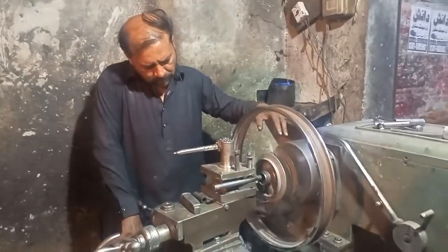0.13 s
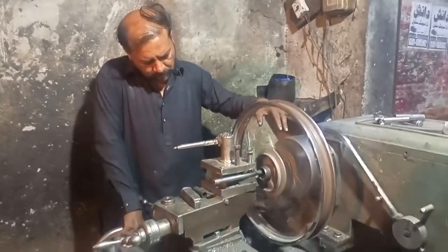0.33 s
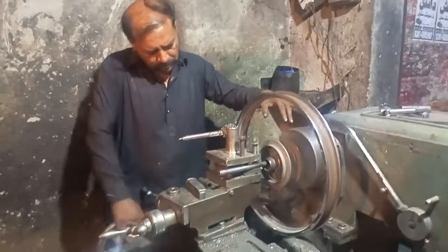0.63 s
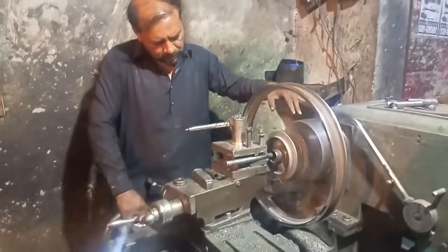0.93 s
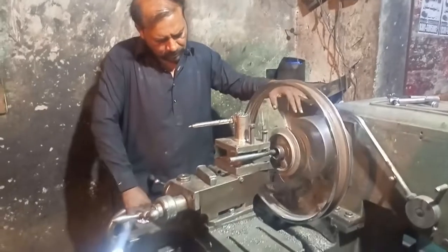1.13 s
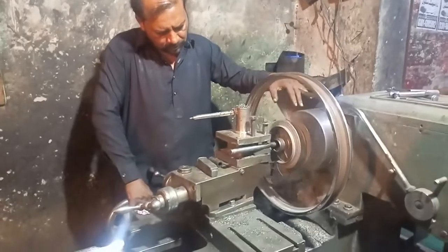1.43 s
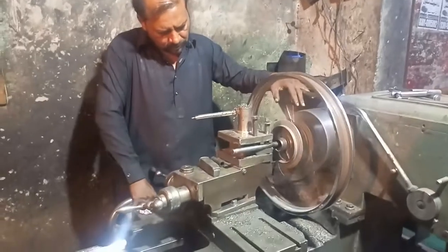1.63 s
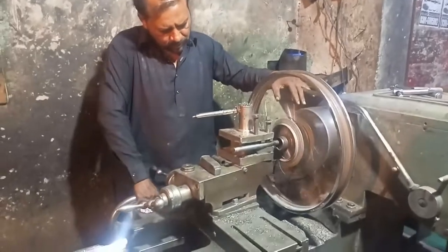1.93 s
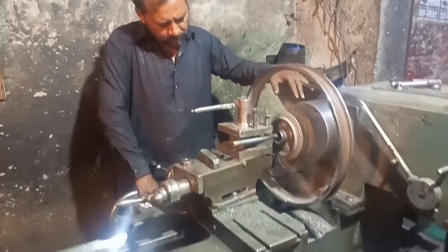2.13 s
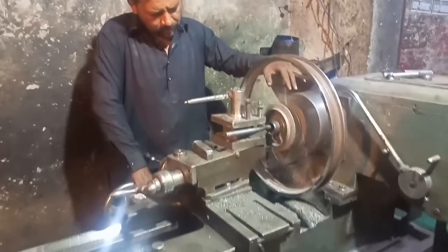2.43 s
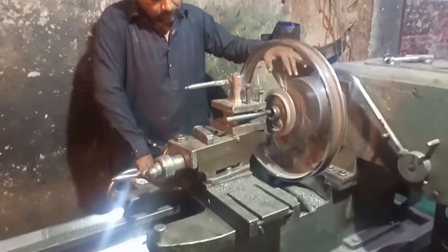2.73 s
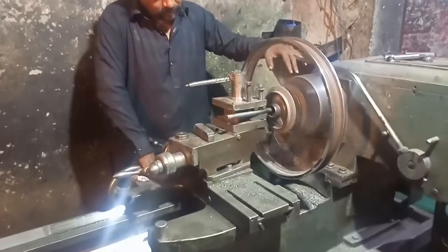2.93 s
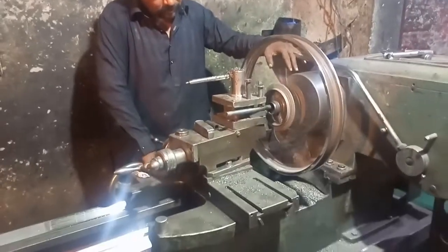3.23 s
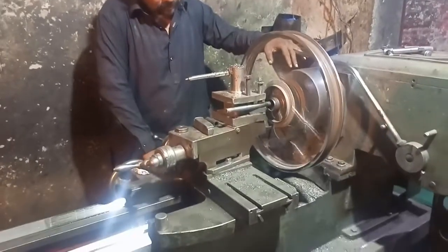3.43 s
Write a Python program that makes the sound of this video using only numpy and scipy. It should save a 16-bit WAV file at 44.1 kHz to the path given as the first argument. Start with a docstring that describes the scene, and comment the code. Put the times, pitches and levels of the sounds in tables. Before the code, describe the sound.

Metal scraping on a lathe: a thin whine near 2 kHz and soft gear hiss idle over a low, patchy workshop murmur with faint hum. At about 0.3 s the tool bites abruptly, with a dense bright rasp heaviest until 1.1 s, a chatter band climbing near 1 s. A thinner scrape follows, with uneven beating squeals and ringing flares, until 3.3 s, when it quickly dies back to idle.

```python
"""Metal lathe in a workshop

A lathe idles with a thin whine in front of one microphone; a tool bites into the turning wheel hub for three seconds.
The workshop lies beneath as a patchy murmur of shaped noise with brief soft tones; a low hum is two sines
of fixed pitch whose levels waver slightly. The idle is gear hiss and a band of noise; the scrape is friction
noise lifted at the hub's resonances, with a squeal that beats against a neighbouring mode,
a climbing chatter band and single modes that flare and fade.
"""
import sys
import numpy as np
from scipy import signal
from scipy.fft import rfft, irfft, next_fast_len
from scipy.io import wavfile
from scipy.ndimage import uniform_filter1d, map_coordinates

SR = 44100
rng = np.random.default_rng(int(sys.argv[2]) if len(sys.argv) > 2 else 0)


def file_out(sig):
    """Save sig as 16-bit WAV at sys.argv[1]."""
    # one column per channel
    cols = np.atleast_2d(sig).T
    # limit, then scale
    lim = np.clip(cols, -1, 1)
    pcm = np.round(lim * 32767).astype(np.int16)
    wavfile.write(sys.argv[1], SR, pcm)


N = 158760  # samples, 3.6 s


def amp(db):
    """Turn dB into gain."""
    return 10 ** (np.asarray(db) / 20)


def unit(x):
    """Scale to rms 1."""
    return x / np.sqrt(np.mean(x ** 2) + 1e-20)


def curves(rows):
    """Draw each column after the time as a line with one value per sample."""
    s, *cols = np.transpose(rows)
    return [np.interp(np.arange(N) / SR, s, c) for c in cols]


def wobble(rate):
    """Draw a smooth random curve with rate knots a second."""
    coarse = np.arange(0, N + 32, 32)
    knots = rng.standard_normal(int(N * rate / SR) + 4)
    return np.interp(np.arange(N), coarse, map_coordinates(knots, [coarse * rate / SR]))


def filtered(x, response):
    """Multiply the spectrum of x by a response of frequency."""
    m = next_fast_len(N + 8192)  # zero padding keeps the end from wrapping onto the start
    return irfft(rfft(x, m) * response(np.fft.rfftfreq(m, 1 / SR)), m)[..., :N]


def narrow_noise(turn, width_hz):
    """Noise around a moving centre: two random curves on a cosine and a sine of the phase turn."""
    return wobble(width_hz) * np.cos(turn) + wobble(width_hz) * np.sin(turn)


def patch_field(shape, high, long):
    """Random field of rms 1 over frequency and time, smoothed over high bins and long frames."""
    field = uniform_filter1d(rng.standard_normal(shape), size=high, axis=0)
    return unit(uniform_filter1d(field, size=long, axis=1))


# Narrow modes of the hub, levels relative to each other: (f/Hz, level/dB)
HUB_MODES = [(1787, -52.5), (1825, -62), (1873, -57), (1916, -51), (2035, -59.5), (2277, -73), (2713, -75),
             (2853, -77), (2961, -79), (3257, -71.5), (3418, -82), (4296, -69.5), (4463, -75.5),
             (4743, -68.5), (4791, -71), (4845, -73.5), (5023, -68), (5652, -84), (5868, -71),
             (6045, -67.5), (6191, -61.5), (6261, -70.5), (6535, -65), (6632, -60.5), (8150, -81),
             (8818, -60.5), (8931, -63), (9405, -67), (10820, -89)]
MODE_WIDTH_HZ, MODE_WANDER_HZ = 28, 22
MODE_FLICKER_DB, FLICKER_RATE = 3.6, 10  # the rate is in knots a second


def rush(spectrum, patchy_db, modes_db=None, bands_db=0):
    """Coloured noise of rms 1 with patches of random gain, lifted at the hub's wandering modes if asked."""
    z = signal.stft(rng.standard_normal(N), nperseg=1024)[2]
    gain_db = patchy_db * patch_field(z.shape, high=3, long=8)
    gain_db = gain_db + bands_db * patch_field(z.shape, high=8, long=18)
    patchy = signal.istft(z * amp(gain_db), nperseg=1024)[1][:N]
    f, level = np.transpose(spectrum)
    # straight lines over log frequency
    out = filtered(patchy, lambda hz: amp(np.interp(np.log(hz + 1), np.log(f + 1), level)))
    if modes_db is None:
        return unit(out)
    modes = [m for m in HUB_MODES if f[1] <= m[0] <= f[-2]]
    for hz, db in modes:
        turn = 2 * np.pi * np.cumsum(hz + MODE_WANDER_HZ * wobble(4)) / SR
        line = narrow_noise(turn, MODE_WIDTH_HZ) * np.sqrt(MODE_WIDTH_HZ / SR)
        over_db = level.max() + modes_db + db - max(m[1] for m in modes)
        out = out + amp(over_db + MODE_FLICKER_DB * wobble(FLICKER_RATE)) * line
    return unit(out)


def swells(rows, stretch, rough, spread_hz, skirt_hz):
    """Tones that rise and fade smoothly, unsteady in pitch, each blurred by narrow noise around it."""
    out, t = np.zeros(N), np.arange(N) / SR
    drift = spread_hz * wobble(30)
    skirt = rough * (wobble(skirt_hz) + 1j * wobble(skirt_hz))
    for s, length, hz, db in rows:
        at = np.arange(max(0, int((s - 2 * length) * SR)), min(N, int((s + 2 * length) * SR)))
        draw = (at + rng.integers(N)) % N  # each tone reads the random curves from another place
        bell = np.exp(-.5 * (np.abs(t[at] - s) / (stretch * length)) ** 2.22)
        tone = np.exp(2j * np.pi * (hz * t[at] + np.cumsum(drift[draw]) / SR))
        blurred = np.imag((1 + skirt[draw]) * tone) / np.sqrt(1 + rough ** 2)
        out[at] += amp(db + 1.0) * bell * blurred
    return out


# Colour of the room's murmur: (f/Hz, relative level/dB per Hz)
MURMUR_COLOUR = [(15, -64), (25, -30), (70, -26), (97, -10), (129, -16), (220, -10.5), (381, -0.5),
                 (595, -4), (694, -4), (977, -12), (1240, -0.5), (1500, -37), (1950, -29), (3300, -120)]
# Course of the murmur, before a lift of 4.5 dB: (t/s, level/dB)
MURMUR_COURSE = [(0.0, -88), (0.31, -80), (0.79, -89.5), (1.05, -85.5), (1.46, -82.5), (1.9, -86.5),
                 (2.41, -85), (2.94, -86), (3.01, -85.5), (3.6, -98.5)]


def murmur():
    """Low patchy murmur of the workshop: shaped noise with strong random patches."""
    return amp(curves(MURMUR_COURSE)[0] + 4.5) * rush(MURMUR_COLOUR, patchy_db=5.5)


# Brief soft tones below the squeal, before the 1 dB lift in swells: (centre t/s, length/s, f/Hz, level/dB)
SOFT_TONES = [(0.02, 0.044, 571, -77), (0.12, 0.062, 1480, -65), (0.23, 0.065, 460, -52),
              (0.25, 0.17, 364, -74), (0.42, 0.044, 694, -79), (0.68, 0.025, 422, -70.5),
              (0.81, 0.067, 793, -61), (0.82, 0.07, 1280, -69), (0.84, 0.12, 1483, -64.5),
              (0.92, 0.14, 1614, -58.5), (1.35, 0.13, 791, -77), (1.37, 0.082, 698, -66.5),
              (1.38, 0.06, 228, -76), (1.62, 0.076, 758, -77), (1.9, 0.051, 1534, -72),
              (2.09, 0.055, 1255, -68), (2.14, 0.054, 412, -77.5), (2.44, 0.036, 418.6, -71),
              (2.52, 0.071, 470, -75.5), (2.55, 0.071, 1183, -73.5), (2.76, 0.064, 395, -77.5),
              (2.92, 0.083, 1274, -76), (3.11, 0.18, 1270, -82.5), (3.29, 0.099, 705, -81.5),
              (3.43, 0.11, 524.3, -82)]


def soft_tones():
    """Brief tones in the murmur, lightly blurred in pitch."""
    return swells(SOFT_TONES, stretch=0.44, rough=0.37, spread_hz=14, skirt_hz=130.4)


def workshop():
    """The room behind the lathe: a low patchy murmur with brief tones in it."""
    return murmur() + soft_tones()


# Tones of the low hum, before a lift of 5 dB: (f/Hz, level/dB)
HUM_TONES = [(100, -99), (228, -106)]


def low_hum():
    """Low hum: two sines of fixed pitch, at 100 and 228 Hz, whose levels waver slightly."""
    t = np.arange(N) / SR
    return sum(amp(db + 5 + wobble(12)) * np.sin(2 * np.pi * hz * t) for hz, db in HUM_TONES)


# Colour of the gears running free: (f/Hz, relative level/dB per Hz)
GEAR_COLOUR = [(1500, -66), (2600, -13), (2900, -17), (3260, 2.5), (3700, -7.5), (4300, -22.5),
               (5080, -1.5), (5800, -20.5), (6550, -5), (7300, -19), (7900, -6.5), (8300, -18.5),
               (9400, -6), (9900, -18), (10300, -4), (11100, -24.5), (11700, -16), (13300, -34.5),
               (14350, -51), (14600, -11.5), (15100, -11.5), (15350, -41)]
# Course of the gear hiss, before the tilt: (t/s, level/dB)
GEAR_COURSE = [(0, -80), (.2, -79.5), (.4, -72), (3.3, -74), (3.6, -78.5)]
# Treble tilt about 3 kHz, duller at first: (t/s, slope/dB per kHz)
GEAR_TILT = [(0, -2.5), (.25, -1.8), (.4, 1), (3.6, 0.56)]


def gears():
    """Hiss of the gears running free: shaped noise whose treble opens up after the start."""
    hz, s, z = signal.stft(rush(GEAR_COLOUR, patchy_db=3.0), SR, nperseg=512)
    tilt_db = np.outer(hz / 1000 - 3, np.interp(s, *np.transpose(GEAR_TILT)))
    hiss = signal.istft(z * amp(tilt_db), SR, nperseg=512)[1][:N]
    return amp(curves(GEAR_COURSE)[0]) * hiss


# Colour of the free-running whine: (f/Hz, relative level/dB per Hz)
IDLE_WHINE_COLOUR = [(820, -32), (1400, -18.5), (1440, -13), (1530, -19), (1660, -12.5), (2030, 12.5),
                     (2360, -16.5), (2440, -15), (2900, -37.5), (3770, -86), (6380, -120)]
IDLE_WHINE_DB = -58.5  # rms


def idle_whine():
    """Thin whine of the free-running lathe: noise peaking near 2 kHz, steady in level but patchy."""
    return amp(IDLE_WHINE_DB) * rush(IDLE_WHINE_COLOUR, patchy_db=5.0)


def lathe():
    """The idling machine: low hum, gear hiss and whine."""
    return low_hum() + gears() + idle_whine()


# Colour of the finest spray: (f/Hz, relative level/dB per Hz)
SPRAY_COLOUR = [(9500, -58), (11200, -6), (11900, 5), (12700, -9.5), (13500, -14), (14000, -9),
                (14400, 3.5), (15000, -5.5), (15600, -1.5)]
# Course of the spray, before chatter and contact: (t/s, level/dB)
SPRAY_COURSE = [(0.26, -100), (0.31, -67), (0.42, -68), (0.49, -54), (0.61, -60), (0.83, -58.5), (1.1, -70),
                (1.42, -71), (1.75, -65), (1.88, -71), (2.65, -68.5), (2.79, -71), (3.27, -67), (3.35, -94),
                (3.42, -96)]


def spray(chatter_db):
    """Finest spray of the cut: high noise that follows the shared chatter."""
    return amp(curves(SPRAY_COURSE)[0] + chatter_db) * rush(SPRAY_COLOUR, patchy_db=2.5, bands_db=0.5)


# Colour of the even hiss of the heavy cut: (f/Hz, relative level/dB per Hz)
HEAVY_COLOUR = [(1900, -36), (2400, -1.5), (3700, -8), (4600, -1), (5600, -1.5), (7500, -7), (9000, -33)]
# Course of the heavy cut, before chatter and contact: (t/s, level/dB)
HEAVY_COURSE = [(0.3, -80), (0.4, -70), (0.48, -57.5), (0.8, -56.5), (0.98, -61), (1.1, -75), (1.3, -76.5),
                (3.6, -70.5)]


def heavy_cut_hiss(chatter_db):
    """Even broad hiss, strongest while the cut is heavy."""
    return amp(curves(HEAVY_COURSE)[0] + chatter_db) * rush(HEAVY_COLOUR, patchy_db=0.5, bands_db=3.0)


# Chatter band that rises, before contact: (t/s, f/Hz, level/dB)
CLIMB_PATH = [(0.8, 2430, -73), (0.9, 2500, -59.5), (1.02, 2664, -54.5), (1.1, 2870, -62.5),
              (1.2, 2980, -86)]
CLIMB_WIDTH_HZ = 220


def climb():
    """A narrow band of noise that glides upward as the heavy cut eases."""
    hz, db = curves(CLIMB_PATH)
    turn = 2 * np.pi * np.cumsum(hz) / SR
    return amp(db) * unit(narrow_noise(turn, CLIMB_WIDTH_HZ))


# Flares of single hub modes, before the 1 dB lift in swells: (centre t/s, length/s, f/Hz, level/dB)
MODE_FLARES = [(0.15, 0.055, 4120, -75.5), (0.13, 0.042, 5070, -86), (0.18, 0.097, 4730, -80),
               (0.19, 0.082, 2444, -68), (0.23, 0.14, 3230, -78), (0.36, 0.079, 2280, -57),
               (0.46, 0.12, 4090, -58.5), (0.47, 0.31, 6470, -71), (0.79, 0.13, 8816, -51),
               (0.83, 0.17, 6180, -66), (0.88, 0.27, 6490, -49), (0.92, 0.25, 2275, -55),
               (0.93, 0.13, 9080, -49.5), (1.08, 0.061, 6590, -51), (1.21, 0.075, 6590, -51.5),
               (1.23, 0.31, 2996, -59), (1.28, 0.065, 5903, -53.5), (1.31, 0.07, 4350, -66),
               (1.34, 0.074, 6260, -52.5), (1.42, 0.12, 2805, -67), (1.46, 0.063, 4534, -58),
               (1.51, 0.32, 4815, -52), (1.57, 0.12, 3260, -62.5), (1.6, 0.017, 4810, -53),
               (1.62, 0.079, 4427, -55.5), (1.7, 0.16, 6905, -57.5), (1.74, 0.12, 3220, -58),
               (1.84, 0.13, 6198, -51), (1.92, 0.11, 3200, -60.5), (2.02, 0.1, 6590, -50.5),
               (2.03, 0.064, 6110, -54), (2.06, 0.1, 4020, -74), (2.17, 0.15, 6145, -54.5),
               (2.18, 0.1046, 2825, -63.5), (2.26, 0.1, 6776, -56.5), (2.31, 0.16, 4755, -57),
               (2.32, 0.068, 5050, -49), (2.37, 0.041, 2415, -67), (2.41, 0.11, 3107, -60),
               (2.42, 0.086, 5030, -56.5), (2.53, 0.092, 5085, -60), (2.56, 0.056, 6210, -77),
               (2.59, 0.083, 4750, -57), (2.65, 0.054, 4430, -56.5), (2.59, 0.08, 2850, -61.5),
               (2.84, 0.2, 2820, -62.5), (2.97, 0.034, 6100, -55), (2.99, 0.095, 2260, -62),
               (3.22, 0.063, 6417, -54.5), (3.26, 0.035, 8650, -55.5)]


def mode_flares():
    """Single hub modes that swell and fade, strongly blurred by noise."""
    return swells(MODE_FLARES, stretch=.42, rough=1.1, spread_hz=19, skirt_hz=140)


# Colours of the six friction regions, each: (f/Hz, relative level/dB per Hz)
AROUND_SQUEAL = [(800, -82), (1300, -47), (1550, -30.5), (1680, -17), (1770, -6), (1860, 2), (1980, -2),
                 (2080, -5), (2170, -18), (2340, -17.5), (2500, -28), (3250, -50), (5500, -120)]
LOWER_RASP_COLOUR = [(1300, -69), (2100, -17), (2280, -6), (2390, -11), (2500, 2.5), (2700, -8), (2960, -7),
                     (3100, 1.5), (3280, -3), (3450, 6), (3650, -12), (4200, -41), (8000, -120)]
UPPER_RASP_COLOUR = [(2000, -90), (3500, -36), (3750, -12), (3950, 0), (4250, -2), (4560, -0.5), (4800, -8),
                     (5000, -11), (5250, 4), (5450, -9.5), (5650, -28), (6500, -45), (12500, -120)]
LOWER_HISS_COLOUR = [(3200, -87), (5300, -35), (5650, -4.5), (5850, -10), (6150, -2.5), (6380, -2),
                     (6580, -0.5), (6850, -3.5), (7100, -15.5), (7400, -27), (7800, -53.5), (10000, -38),
                     (17000, -120)]
UPPER_HISS_COLOUR = [(5000, -68), (7400, -16), (7900, -17), (8400, -10), (8850, -4.5), (9150, -3.5),
                     (9450, 3), (9900, -8), (10300, -10.5), (10600, -36.5), (12000, -58), (20000, -120)]
HIGHEST_COLOUR = [(8000, -56.5), (10300, -2), (10800, 2.5), (11150, -11), (11500, -25), (13000, -72)]
# Course of the six regions, before trim, chatter and contact:
# (t/s, around the squeal level/dB, lower rasp level/dB, upper rasp level/dB,
#  lower hiss level/dB, upper hiss level/dB, highest band level/dB)
FRICTION_COURSE = [(0.2, -57, -66, -81, -101, -99, -109), (0.27, -55, -80, -95, -91, -92, -99),
                   (0.289, -50, -95, -69, -54.5, -57, -71), (0.32, -41, -91, -59, -51.5, -59, -61.5),
                   (0.37, -42, -62, -52, -49.5, -52.5, -60), (0.45, -40, -61, -49.5, -45, -50.5, -59.5),
                   (0.6, -40.5, -57, -50, -44, -49.5, -61), (0.77, -41.5, -48.5, -47, -44, -52.5, -55.5),
                   (0.98, -45, -51, -47, -45, -50.5, -67), (1.08, -40, -55.5, -52, -47.5, -60, -68),
                   (1.11, -50.5, -60.5, -54.5, -53, -54.5, -71), (1.26, -42, -59.5, -56, -51, -52.5, -72),
                   (1.46, -58.5, -58, -63, -52, -52, -79), (1.65, -53, -65.5, -60, -57.5, -51, -67),
                   (1.79, -59.5, -61, -56.5, -53.5, -50.5, -76), (1.83, -46.5, -68, -57.5, -58, -53, -81),
                   (1.92, -52, -60, -59, -56, -50.5, -74), (1.98, -46, -59.5, -57, -54.5, -53, -74),
                   (2.18, -55, -62, -57.5, -54.5, -52, -75), (2.34, -58, -63.5, -59, -56, -51.5, -75),
                   (2.45, -52, -61, -62, -58.5, -51.5, -63.5), (2.59, -57, -60.5, -63.5, -56, -50, -66),
                   (2.78, -52.5, -62.5, -62, -56.5, -52, -68), (2.83, -52.5, -64, -62, -60, -53, -64),
                   (3.03, -48, -62, -58.5, -56.5, -54, -60.5), (3.21, -50, -61.5, -58.5, -59.5, -52.5, -69),
                   (3.28, -43, -70, -62, -65, -51.5, -66.5), (3.38, -61, -76, -94, -74, -75, -92),
                   (3.45, -69, -83, -77, -84, -74, -81)]
# How far the strongest mode is set above the colour's peak, one per region: (level/dB)
MODE_LIFT = [2, 13.1, 13, 12.1, 3.4, 5.8]
# Trim on each region's course, one per region: (level/dB)
FRICTION_TRIM = [-3.5, -4, -2, -2, -1.5, 1.5]
# Depth of the random patches, one per region: (depth/dB)
PATCH_DEPTH = [2.9, 4.4, 1.7, 2.8, 1.11, 5.1]
BANDS_DB = 2.13  # depth of the broad, slowly shifting bands


def friction(chatter_db):
    """Tool on metal: patchy noise in six regions, each lifted at the hub's modes within it."""
    colours = [AROUND_SQUEAL, LOWER_RASP_COLOUR, UPPER_RASP_COLOUR,
               LOWER_HISS_COLOUR, UPPER_HISS_COLOUR, HIGHEST_COLOUR]
    out = np.zeros(N)
    for level_db, colour, lift_db, trim_db, patchy_db in zip(
            curves(FRICTION_COURSE), colours, MODE_LIFT, FRICTION_TRIM, PATCH_DEPTH):
        out += amp(level_db + trim_db + chatter_db) * rush(colour, patchy_db, lift_db, BANDS_DB)
    return out


# Strongest mode of the hub, before a lift of 2 dB and contact: (t/s, f/Hz, level/dB)
SQUEAL_PATH = [(0.25, 1979, -68), (0.3, 1933, -45.5), (0.48, 1897, -43.5), (0.5, 1892, -49.5),
               (0.71, 1903, -46), (0.82, 1908, -80), (0.87, 1892, -45), (0.92, 1943, -48.5),
               (0.97, 1853, -42), (1.02, 1905, -51.5), (1.09, 1919, -42), (1.11, 1868, -55),
               (1.23, 1883, -43), (1.41, 1912, -55.5), (1.45, 1907, -63), (1.48, 1909, -48.5),
               (1.56, 1916, -56), (1.58, 1930, -47), (1.63, 1890, -60), (1.67, 1928, -46),
               (1.76, 1901, -62.5), (1.85, 1933, -43.5), (1.9, 1910, -54), (1.99, 1907, -39),
               (2.07, 1915, -50.5), (2.1, 1908, -38), (2.14, 1941, -57), (2.17, 1873, -45),
               (2.21, 1942, -44), (2.26, 1890, -59.5), (2.32, 1953, -48.5), (2.37, 1938, -65),
               (2.44, 1906, -46), (2.6, 1945, -72), (2.65, 1922, -44.5), (2.69, 1890, -58.5),
               (2.78, 1929, -47.5), (2.84, 1916, -58), (3.06, 1941, -41.5), (3.21, 1956, -68),
               (3.243, 1930, -70), (3.256, 1915, -39), (3.275, 1928, -40.5), (3.31, 1913, -49.5),
               (3.34, 1985, -61), (3.4, 1952, -58)]
TWIN_BELOW_HZ, TWIN_DB = 46, -11  # mean distance and typical level of the neighbouring mode


def squeal():
    """The hub's strongest mode, sung in uneven bursts, beating with its lower neighbour."""
    hz, db = curves(SQUEAL_PATH)
    turns = np.cumsum(hz + 10 * wobble(45)) / SR
    twin_turns = turns - np.cumsum(TWIN_BELOW_HZ + 7 * wobble(14)) / SR
    twin = amp(TWIN_DB + 4.9 * wobble(8.05)) * np.sin(2 * np.pi * twin_turns)
    roughness = 1 + 0.22 * wobble(90)
    return amp(db + 2.0) * roughness * (np.sin(2 * np.pi * turns) + twin)


BITE_S, LIFT_S = 0.2705, 3.33  # the tool meets and leaves the hub
RISE_S, FALL_S = 0.025, 0.17  # time to full contact; time to fall by 20 dB


def contact():
    """Gain from 0 to 1: the tool is on the hub; the ring dies away after it lifts."""
    t = np.arange(N) / SR
    return np.clip((t - BITE_S) / RISE_S, 0, 1) * amp(-20 * np.clip(t - LIFT_S, 0, None) / FALL_S)


def scrape():
    """The tool on the hub: noise layers and squeal under the contact gain, plus free mode flares."""
    chatter_db = 0.62 * wobble(30.55)  # shared by the three noise layers
    noise = friction(chatter_db) + heavy_cut_hiss(chatter_db) + spray(chatter_db)
    return contact() * (noise + climb() + squeal()) + mode_flares()


def scene():
    """All sources at one microphone, from the room to the tool."""
    return (workshop() + lathe() + scrape())[None]


TOP_HZ = 15720  # band limit


def record(dry):
    """The microphone drops the deep bass; nothing passes above the band limit."""
    def response(hz):
        treble_edge = np.clip((TOP_HZ - hz) / 80, 0, 1) ** 2
        return treble_edge / (1 + (35 / (hz + 1)) ** 2)
    return filtered(dry, response)


dry = scene()
out = record(dry)
file_out(out)
```